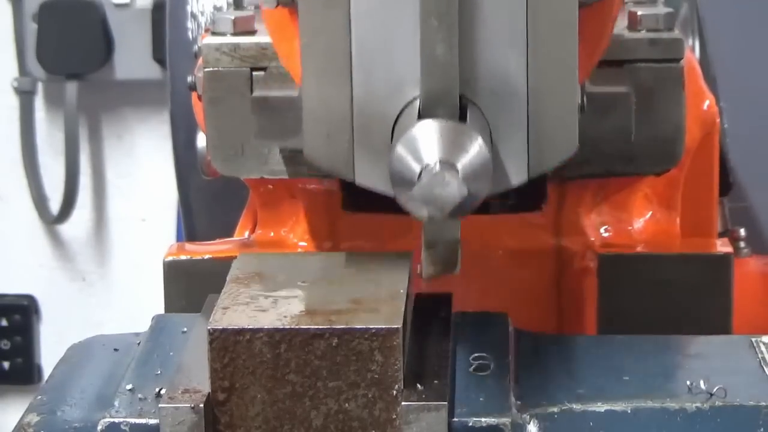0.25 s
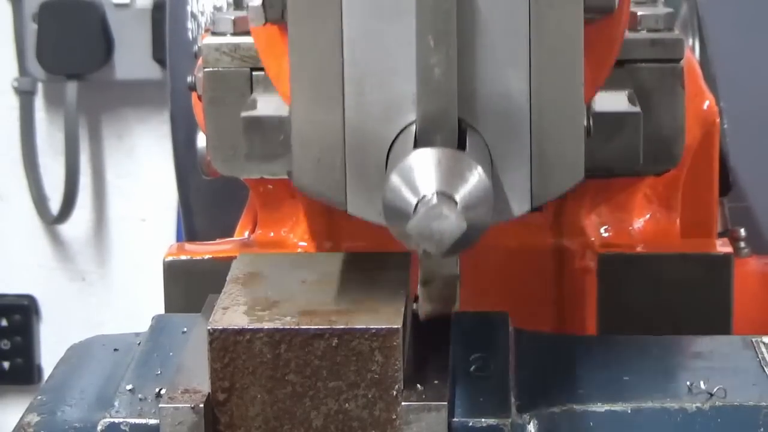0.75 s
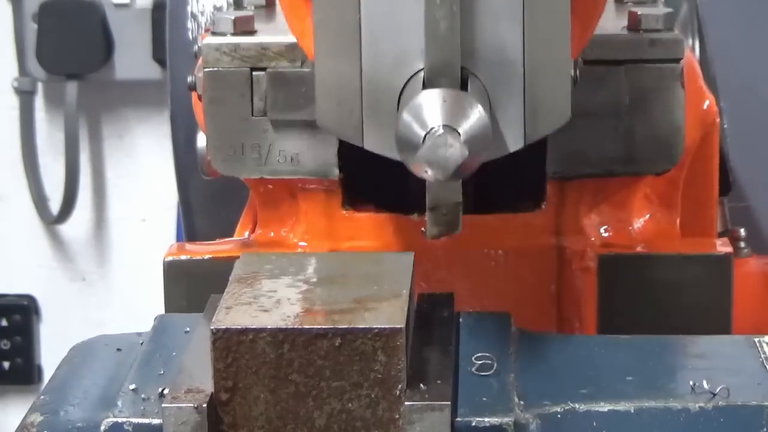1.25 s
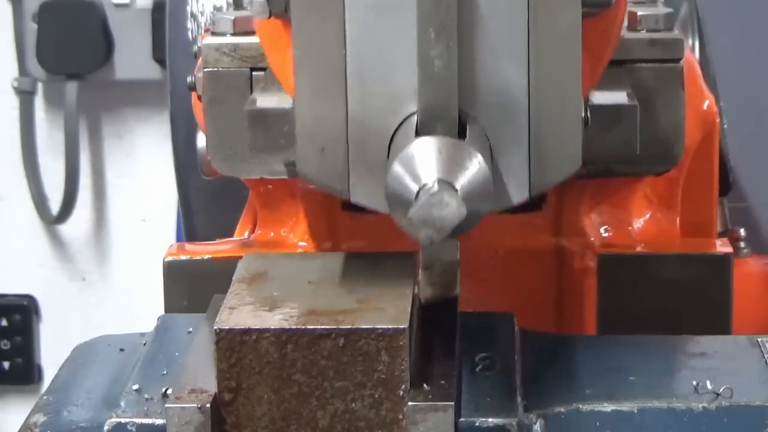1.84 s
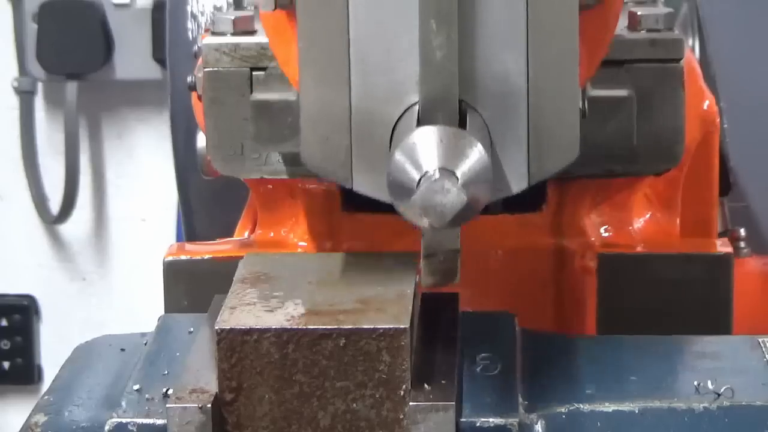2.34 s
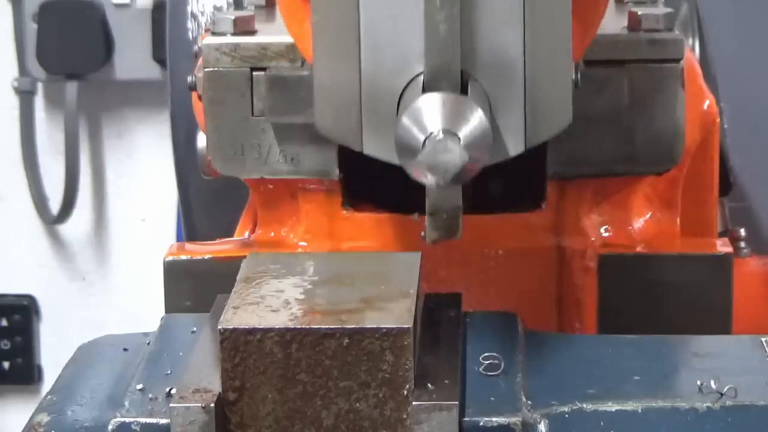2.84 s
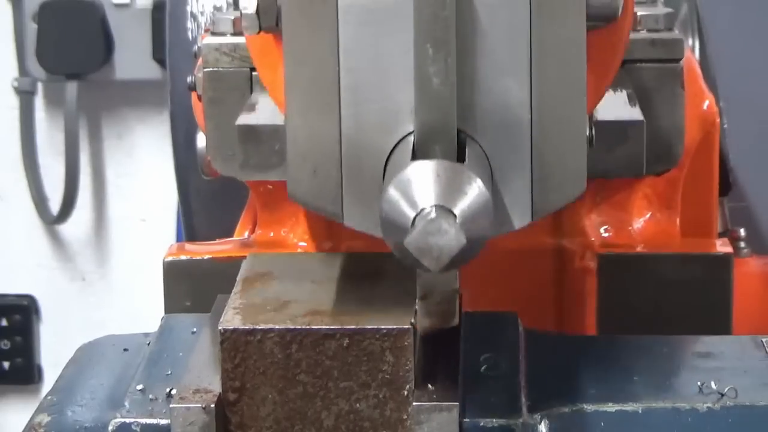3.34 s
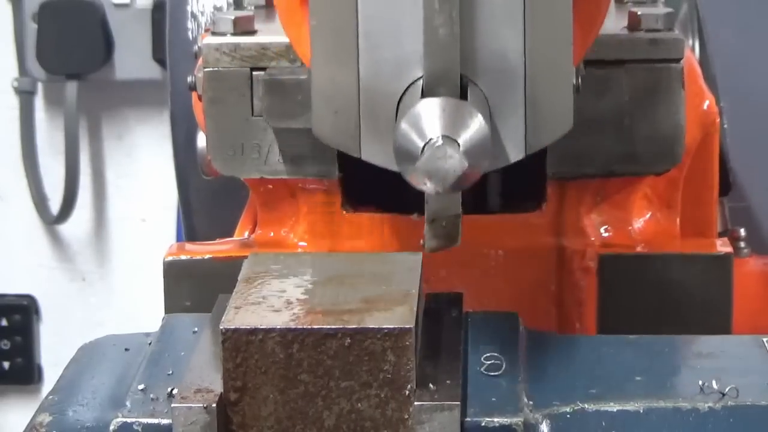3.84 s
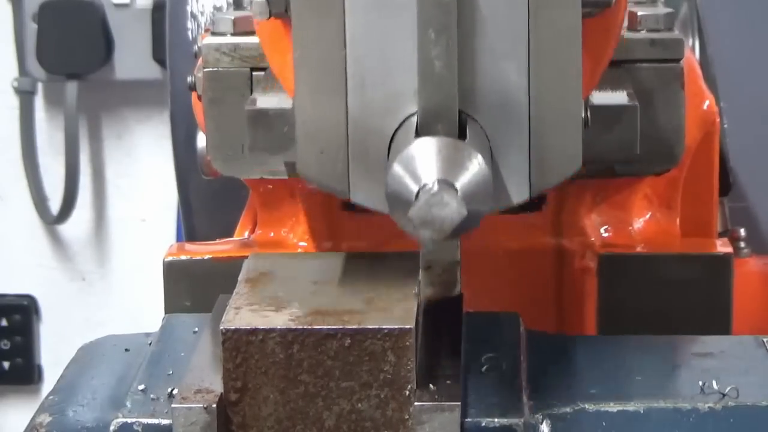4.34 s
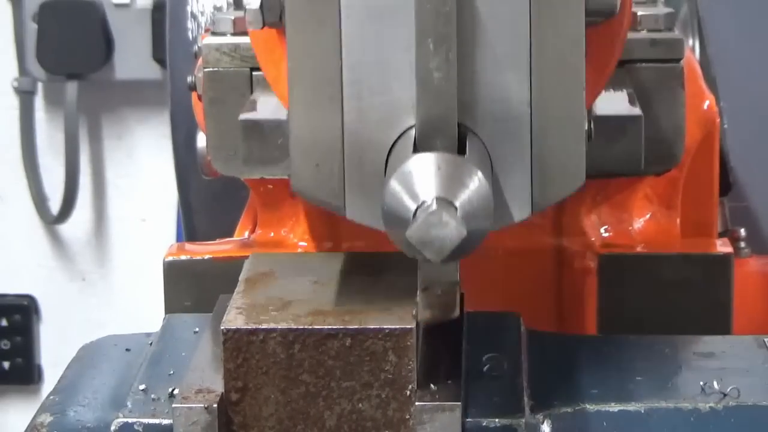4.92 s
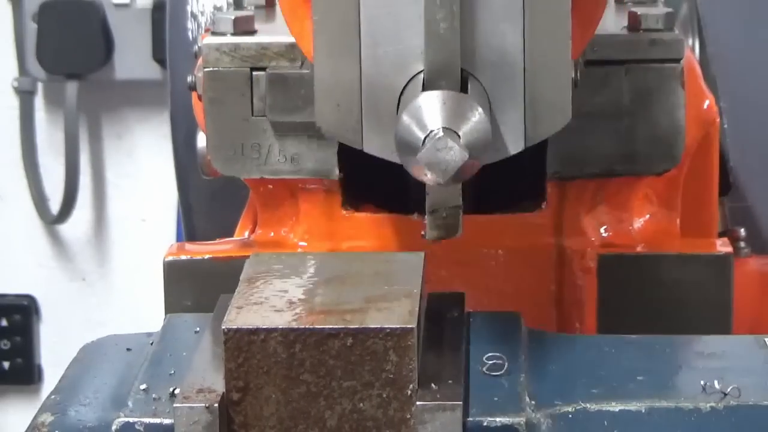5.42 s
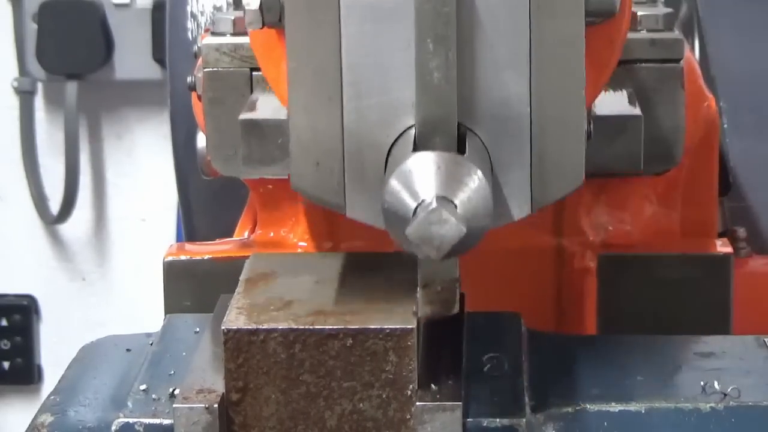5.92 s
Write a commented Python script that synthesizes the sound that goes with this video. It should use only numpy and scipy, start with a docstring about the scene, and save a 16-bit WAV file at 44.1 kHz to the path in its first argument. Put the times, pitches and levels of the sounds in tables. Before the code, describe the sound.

Close beside a running shaping machine: low, rough gear drone swelling and booming in a regular beat, ram slides hissing on the cut and rasping brighter on the quick return, and a piercing electric whine above. Rapid metallic ratchet clicks with gritty screw rubs come in the first two and a half seconds, thinning to pairs each stroke. A few chips crackle and ring, with faint short workshop echo.

```python
"""A small metal shaper cuts a steel block close by: its gear-driven casting drones and swells each stroke.
Two casting tones, gear-tooth tones and filtered noise from the sliding ram follow the stroke.
The motor whines in a cluster of wavering sine tones, over a low hum and a steady hiss.
Chips snap and ring as short bursts of noise; the feed ratchet clicks in fading sines and noise,
its screw rubs, and the clicks, rubs and chips echo faintly off the workshop walls."""
import sys
import numpy as np
from scipy import signal
from scipy.fft import rfft, irfft
from scipy.io import wavfile

SR = 44100
rng = np.random.default_rng(int(sys.argv[2]) if len(sys.argv) > 2 else 0)


def materialize(psi):
    """Save the field psi as 16-bit PCM at rate SR to the path in sys.argv[1].

    A 1-D psi becomes a single channel; in a 2-D psi each row is a channel.
    """
    bounded = np.clip(np.atleast_2d(psi).T, -1, 1)
    quanta = np.round(bounded * 32767).astype(np.int16)
    wavfile.write(sys.argv[1], SR, quanta)


N = 271656
TIME = np.arange(N) / SR  # seconds
BINS = np.fft.rfftfreq(N, 1 / SR)  # Hz

STROKE_S = .8268  # one turn of the bull gear (the big gear)
TEETH, SHAFT_TURNS = 80, 16  # bull gear teeth, and pinion shaft turns in a stroke
EDGE_HZ = 11030  # top of the sound's range
EASE_DB_PER_S = 0.21  # the machine runs a little lighter as it goes on

# Motor drive: switching rate, supply frequency, passing rate of the rotor slots
CARRIER_HZ, DRIVE_HZ, SLOT_HZ = 7823.35, 50.06, 743.5
# Whine tones around the switching rate: [supply_multiple, slot_multiple, level_db, left_over_right_db]
WHINE_TONES = [(-11, 0, -45, 1), (-8, 0, -53, -1), (-7, 0, -50, -1), (-5, 0, -35, 6), (-4, 0, -44, 1),
               (-3, 0, -42, 0), (-1, 0, -48, -4), (0, 0, -54, 3), (1, 0, -28, -2), (2, 0, -45, 1),
               (3, 0, -51, 0), (4, 0, -44, -1), (5, 0, -36, 0), (6, 0, -51, 2), (7, 0, -46, -3),
               (8, 0, -55, 1), (-1, -1, -58, 0), (1, -1, -52, 0), (5, -1, -54, 4), (-5, 1, -51, -2),
               (-1, 1, -45, -1), (1, 1, -49, 0)]
# The motor's low hum: [pitch_hz, level_db]
MOTOR_HUM = (53.3, -67)

# The casting's two main modes, lower then upper:
# [pitch_hz, idle_level_db, pitch_sway_hz, beat_with_shaft (0-1)]
CASTING_MODES = [(288.3, -33.5, 3.16, 0), (324.8, -37.5, 5.3, 0.44)]
# Spells of load on the bull gear in every stroke: [start_s, length_s, lower_mode_db, upper_mode_db]
GEAR_LOADS = [(.005, 0.065, -48, -29.5), (0.127, .035, -44, -27), (0.211, 0.11, -25.5, -35.5),
              (0.358, 0.023, -29.5, -31.5), (.53, 0.073, -33, -32.5), (0.63, 0.096, -33.5, -32.5),
              (0.792, 0.063, -26, -30.5)]
LOAD_ATTACK_S, LOAD_RELEASE_S = .025, 0.031
# The boom of each stroke, when the gear takes up its play: moment in the stroke, width, level
BEAT_S, BEAT_WIDTH_S, BEAT_DB = 0.2168, 0.015, -20.5

# Tooth-rate tones, each furthest from its opposite level at moment_s in the stroke;
# a negative swing makes that the quietest moment: [multiple, middle_level_db, moment_s, swing_db]
TOOTH_TONES = [(1, -62.5, 0.7, 2), (2, -53.5, 0.71, 7), (5, -53, .24, 10.5), (8, -49, 0.52, 8.5),
               (11, -50, 0.54, -11)]

# Rubs of the slides in every stroke (return, run-up, bite, cut):
# [start_s, length_s, gear_rumble_db, slide_hiss_db, treble_over_hiss_db]
SLIDE_RUBS = [(0.379, 0.17, -31.5, -33, 1), (0.577, 0.13, -42, -41.5, 3), (0.761, 0.073, -36, -38.5, 4),
              (0.0043, 0.15, -30.5, -32, 1)]
RUB_ATTACK_S, RUB_RELEASE_S = 0.03, 0.029
IDLE_RUMBLE_DB, IDLE_HISS_DB, IDLE_BRIGHT_DB = -32, -50, 6.5
# The quick return's part of each stroke: [from_s, to_s]
QUICK_RETURN = (0.38, .62)
# Colour of the gear rumble: [pitch_hz, relative_level_db]
RUMBLE_COLOUR = [(40, -47), (150, -15.5), (250, -13), (370, 3), (480, -0.5), (570, -2), (680, 1.5),
                 (790, 1), (960, -1.5), (1060, -0.5), (1250, -4.5), (1600, -7.5), (2700, -9), (3300, -17.5),
                 (6000, -57)]
# Panel resonances of the column: [pitch_hz, width_hz, level_db]
COLUMN_PANELS = [(450, 20, -6), (619, 11, -4), (771, 22, 3), (864, 41, 2.5), (1061, 16.4, 3)]
# Colour of the slide hiss on the quick return: [pitch_hz, relative_level_db]
RETURN_COLOUR = [(400, -30), (1500, -20), (1720, -5.5), (1830, 10), (1950, -4), (2200, 4.5), (2400, -5.5),
                 (2700, -4), (3000, -22), (3400, -12.5), (4050, -2.5), (4700, -16), (5600, -16.5),
                 (11000, -33.5)]
# Resonances of the ram, rung on the quick return: [pitch_hz, width_hz, level_db]
RAM_MODES = [(1880, 58, -14), (2020, 81, -1), (2274, 67, 6.5), (4720, 160, 0)]
# Colour of the slide hiss in the rest of the stroke: [pitch_hz, relative_level_db]
CUT_COLOUR = [(100, -47), (500, -24), (1500, -8.5), (1850, 2), (2150, 2), (2700, 1.5), (3000, -9.5),
              (3400, -9), (4300, -4), (5000, -10), (5700, -15.5), (8000, -9), (11000, -34)]

# Colour of the steady background hiss: [pitch_hz, relative_level_db]
FLOOR_COLOUR = [(20, -9), (38, -9), (54, -2), (72, -2), (110, -7), (160, 11.5), (400, -25), (2000, -4.5),
                (6500, -8.5), (7300, 4.5), (7900, 14), (8500, 7), (9500, -8), (11000, -64)]

# Chips breaking off or landing: [start_s, snap_db, ring_db, ring_pitch_hz, ring_width_hz, ring_60db_fall_s]
CHIP_SNAPS = [(0.3138, -30, -26.5, 2270, 500, 0.14), (.335, -32, -34, 2450, 300, 0.088),
              (1.9384, -22.5, -26, 2630, 500, 0.16), (1.955, -43, -27.5, 1110, 604, 0.19),
              (4.326, -24.5, -31, 1114, 600, 0.13), (4.366, -30, -26, 1148, 600, 0.18),
              (5.1374, -28.5, -25, 1446, 202.3, 0.11), (5.139, -35, -34, 6100, 500, 0.11),
              (5.15, -33, -30, 1162, 690, .12), (5.977, -24, -24, 4060, 864, 0.15),
              (5.982, -44, -13.5, 2757, 130.5, 0.077), (6.007, -33, -29, 2900, 130, 0.14),
              (6.137, -49, -27, 2900, 502, .1)]
# Colour of scraping metal: [pitch_hz, relative_level_db]
SCRAPE_COLOUR = [(80, -46), (300, -24), (900, 0.5), (1500, -4.5), (2100, 2), (2600, -0.5), (3600, -1.5),
                 (4600, -3), (6800, -8.5), (9300, -4.5), (11000, -20.5)]

# Ratchet clicks: [start_s, level_db, treble_crack_db]
PAWL_CLICKS = [(0.6577, -14.5, -3), (0.7637, -10, -5.5), (0.79, -21, -6), (0.812, -8, -2), (0.852, -9, 1),
               (0.8894, -7.5, 1), (0.926, -11, 4), (0.963, -11.5, 5.5), (1.021, -9.5, -8),
               (1.2036, -11.5, 4), (1.2439, -9.5, 1.5), (1.28, -11.5, 1), (1.3148, -5.5, -2.5),
               (1.3498, -11, 5.5), (1.388, -8, -0.5), (1.429, -8, -3), (1.4751, -9, -2.5), (1.53, -9.5, 2),
               (1.6141, -9, -3), (1.736, -11, -5), (2.2622, -10.5, -3.5), (2.3671, -12, -1),
               (2.4418, -9.5, 1), (2.485, -7.5, -2), (2.5514, -16, -1), (2.566, -20.5, 6.5),
               (2.969, -12.5, -4), (3.064, -11, -5.5), (3.1354, -9.5, -8), (3.25, -10, -2),
               (3.923, -9, -10), (4.0067, -9.5, -5.5), (4.772, -11, -1.5), (4.8835, -10.5, -2),
               (5.619, -12, 3.5), (5.745, -7.5, -8), (6.14, -7.5, -19)]
# Ring of the ratchet wheel: [pitch_hz, level_db, 60db_fall_s]
WHEEL_MODES = [(2060, 3, 0.021), (2065, -4.5, 0.027), (2416, -2.5, .05), (2553, 2, 0.095),
               (2695, 1.5, 0.042), (2966, 5.5, 0.014), (3170, -5, 0.07), (3313, 4.5, 0.032),
               (3523, 3, 0.031), (3730, -14, 0.091), (3820, 0, 0.03), (4260, -16, .03), (5530, -2.5, 0.026),
               (6060, -4, 0.027)]
# Quick turns of the feed screw: [start_s, length_s, starting_level_db]
FEED_TURNS = [(.82, 0.22, -31), (1.216, 0.33, -28.5), (2.419, 0.038, -25)]
# The screw rubs less as each turn slows, hence the sag
FEED_ATTACK_S, FEED_RELEASE_S, FEED_SAG_DB_PER_S = 0.056, 0.029, 25

# How alike noise is on the left and right: [pitch_hz, likeness (0-1)]
LIKENESS = [(50, 0.25), (300, 0.85), (600, 0.7), (1200, 0.83), (2500, 0.8), (8000, 0.9)]
# Left-right balance: [pitch_hz, left_over_right_db]
BALANCE = [(50, 6.5), (330, 1), (700, 2.5), (1300, 0.5), (8000, -1)]
# How fast workshop echoes die: [pitch_hz, 60db_fall_s]
WORKSHOP_ECHO = [(300, 0.25), (2500, 0.25), (9000, 0.079)]


def amp(db):
    """Turns decibels into gain."""
    return 10 ** (np.asarray(db) / 20)


def unit(x):
    """Scales a signal to rms 1."""
    return x / np.sqrt(np.mean(x ** 2) + 1e-20)


def read(points, hz):
    """Reads a table between its points, on a log-frequency axis."""
    f, value = np.transpose(points)
    return np.interp(np.log(hz + 1), np.log(f + 1), value)


def add(mix, s, sound):
    """Adds a stereo sound, starting at time s."""
    part = mix[:, round(s * SR):][:, :sound.shape[-1]]
    part += sound[..., :part.shape[1]]


def wander(rate_hz):
    """Random drift of rms 1, in straight steps between two chance values per cycle of the rate."""
    knots = np.arange(0, TIME[-1] + 1, .5 / rate_hz)
    return unit(np.interp(TIME, knots, rng.standard_normal(len(knots))))


def pan(db):
    """Left and right gains for a level difference."""
    return amp(np.array([[.5], [-.5]]) * db)


def peak(hz, width_hz):
    """Gain of one resonance at every frequency, 1 at its top."""
    return 1 / np.sqrt(1 + (2 * (BINS - hz) / width_hz) ** 2)


def resonances(modes):
    """Flat gain of 1 with a hump for each resonance."""
    return 1 + sum(amp(db) * peak(hz, width) ** 2 for hz, width, db in modes)


def noise(gain):
    """Coloured stereo noise of rms 1, partly shared between left and right."""
    common, apart = rfft(rng.standard_normal((2, N)))
    like = np.clip(read(LIKENESS, BINS), 0, 1)
    sides = np.array([[1], [-1]])
    pair = np.sqrt(1 + like) * common + sides * np.sqrt(1 - like) * apart
    return unit(irfft(pair * gain * pan(read(BALANCE, BINS)), N))


def snippet(x, size):
    """Takes a stretch of stereo noise at random."""
    return x[:, rng.integers(N - size):][:, :size]


def grit(per_s, depth_db, decay_s=0.0011):
    """Gain that jumps at each small catch between rubbing surfaces, rms 1."""
    catches = (rng.random(N) < per_s / SR) * np.minimum(rng.exponential(1, N), 3)
    jumps = signal.lfilter([1], [1, -np.exp(-1 / (decay_s * SR))], catches)
    return unit(1 + amp(depth_db) * jumps)


def swell(t, length_s, attack_s, release_s):
    """Rise, hold and fall of something that starts at t = 0."""
    return np.clip(t / attack_s, 0, 1) * np.exp(-np.maximum(t - length_s, 0) / release_s)


def every_stroke(starts, lengths, levels_db, idle_db, attack_s, release_s):
    """Gain of swells that come back each stroke; their powers add to an idling level."""
    swells = [amp(db) * swell((TIME - s) % STROKE_S, length, attack_s, release_s)
              for s, length, db in zip(starts, lengths, levels_db)]
    return np.sqrt(amp(idle_db) ** 2 + np.sum(np.square(swells), 0))


def gear_wear(count):
    """Chance unevenness round the bull gear, the same at every turn."""
    marks = rng.standard_normal(count)
    marks = unit(marks - marks.mean())
    return np.interp(count * TIME / STROKE_S, np.arange(count), marks, period=count)


def shaft(top_s):
    """Swing of the pinion shaft, highest at the given moment."""
    return np.cos(2 * np.pi * SHAFT_TURNS * (TIME - top_s) / STROKE_S)


def easing():
    """Slow loss of load: a falling gain that is 1 halfway through."""
    return amp(-EASE_DB_PER_S * (TIME - TIME.mean()))


def motor(left_lead_rad=0.23, hum_drift_rad=0.73, waver_rad=0.097, flutter=0.085, side_flutter=.07):
    """Inverter switching makes the motor sing at tones spaced by the supply and slot rates, over a hum."""
    sway = [wander(8) for _ in range(4)]
    sides = np.array([[1], [-1]])
    lead = np.array([[left_lead_rad], [0]])
    whine = np.zeros((2, N))
    for k, (supply, slots, db, side_db) in enumerate(WHINE_TONES):
        hz = CARRIER_HZ + supply * DRIVE_HZ + slots * SLOT_HZ
        pitch_sway, level_sway, side_sway = (sway[(k + step) % len(sway)] for step in range(3))
        phase = 2 * np.pi * (hz * TIME + rng.random()) + waver_rad * pitch_sway
        # each tone flutters, and drifts a little between left and right
        level = 1 + flutter * level_sway + sides * side_flutter * side_sway
        whine += pan(side_db) * amp(db) * level * np.sin(phase + lead)
    hum_hz, hum_db = MOTOR_HUM
    hum = amp(hum_db) * np.sin(2 * np.pi * hum_hz * TIME + hum_drift_rad * wander(2.6))
    return np.sqrt(2) * (whine + pan(read(BALANCE, hum_hz)) * hum)


def casting(rough=0.39, rough_width_hz=50, side_db=3.5, left_lead_rad=0.2, shaft_top_s=0.221):
    """Gear teeth drive two modes of the casting, harder under load; the lower one booms once a stroke."""
    starts, lengths, *levels_db = np.transpose(GEAR_LOADS)
    beat = amp(BEAT_DB) * np.exp(-((TIME % STROKE_S - BEAT_S) / BEAT_WIDTH_S) ** 2)
    lead = np.array([[left_lead_rad], [0]])
    out = np.zeros((2, N))
    for (hz, idle_db, sway_hz, throb), load_db, boom in zip(CASTING_MODES, levels_db, (beat, 0)):
        load = every_stroke(starts, lengths, load_db, idle_db, LOAD_ATTACK_S, LOAD_RELEASE_S)
        level = load * (1 + throb * shaft(shaft_top_s)) + boom
        cycles = np.cumsum(hz + sway_hz * gear_wear(count=24)) / SR
        # retune to whole cycles per stroke, locked to the bull gear, so every stroke beats alike
        per_stroke = cycles[round(STROKE_S * SR)]
        cycles = cycles * round(per_stroke) / per_stroke
        tone = np.sqrt(2) * level * np.sin(2 * np.pi * (cycles + rng.random()) + lead)
        # play between the teeth: no two blows are alike, so noise surrounds the tone
        backlash = rough * level.mean() * noise(peak(hz, rough_width_hz) ** 2)
        out += pan(side_db) * tone + backlash
    return out * easing()


def mesh(jitter_rad=0.94, side_db=3):
    """Meeting gear teeth sound multiples of the tooth rate, swelling and fading as the load goes round."""
    teeth_passed = TEETH * TIME / STROKE_S
    out = np.zeros(N)
    for multiple, db, moment_s, swing_db in TOOTH_TONES:
        level = amp(db + swing_db * np.cos(2 * np.pi * (TIME - moment_s) / STROKE_S))
        phase = 2 * np.pi * (multiple * teeth_passed + rng.random()) + jitter_rad * wander(7.6)
        out += level * np.sin(phase)
    return np.sqrt(2) * pan(side_db) * out


def ram(return_db=1, shaft_db=0.24, shaft_top_s=0.033, tooth_db=0.15, wear_db=2.0, grit_db=-3,
        bright_hz=3300):
    """Gear rumble rings the column's panels; the slides hiss on the cut and on the quick return."""
    starts, lengths, rumble_db, hiss_db, bright_db = np.transpose(SLIDE_RUBS)

    def rubs(levels_db, idle_db):
        """Level of the rubbing through every stroke."""
        return every_stroke(starts, lengths, levels_db, idle_db, RUB_ATTACK_S, RUB_RELEASE_S)

    throb_db = shaft_db * shaft(shaft_top_s)
    throb_db = throb_db + tooth_db * np.cos(2 * np.pi * TEETH * TIME / STROKE_S)
    throb_db = throb_db + wear_db * gear_wear(count=TEETH)
    body = amp(read(RUMBLE_COLOUR, BINS)) * resonances(COLUMN_PANELS)
    rumble = noise(body) * rubs(rumble_db, IDLE_RUMBLE_DB) * amp(throb_db)

    moment = TIME % STROKE_S
    returning = (moment > QUICK_RETURN[0]) & (moment < QUICK_RETURN[1])
    rasp = amp(read(RETURN_COLOUR, BINS)) * resonances(RAM_MODES)
    hiss = np.where(returning, amp(return_db) * noise(rasp), noise(amp(read(CUT_COLOUR, BINS))))
    # split off the treble, which follows its own level
    treble = irfft(rfft(hiss) / (1 + (bright_hz / (BINS + 1)) ** 8), N)
    low_part = (hiss - treble) * rubs(hiss_db, IDLE_HISS_DB)
    high_part = treble * rubs(hiss_db + bright_db, IDLE_HISS_DB + IDLE_BRIGHT_DB)
    return rumble + (low_part + high_part) * easing() * grit(200, grit_db)


def background(level_db=-39):
    """Steady hiss of the motor and the shop, as coloured noise."""
    return amp(level_db) * noise(amp(read(FLOOR_COLOUR, BINS)))


def chips(snap_s=0.014, grit_db=3, fizz_db=-9, fizz_hz=9500):
    """A curl of steel snaps in a gritty noise burst and rings roughly, as fading narrow noise."""
    fizz = amp(fizz_db) * noise(peak(fizz_hz, 2500) ** 2)
    scrape = (noise(amp(read(SCRAPE_COLOUR, BINS))) + fizz) * amp(grit_db * wander(300))
    t = np.arange(SR // 4) / SR
    out = np.zeros((2, N))
    for s, snap_db, ring_db, hz, width_hz, fall_s in CHIP_SNAPS:
        ring = snippet(noise(peak(hz, width_hz) ** 2), len(t)) * amp(ring_db - 60 * t / fall_s)
        snap = snippet(scrape, len(t)) * amp(snap_db) * np.exp(-t / snap_s)
        add(out, s, (snap + ring) * (1 - np.exp(-t / 0.00028)))  # soft onset
    return out


def feed_screw(scrape, grit_db=3):
    """The feed screw rubs in short gritty turns, each growing weaker as it slows."""
    rub = np.zeros(N)
    for s, length, db in FEED_TURNS:
        sagging_db = db - FEED_SAG_DB_PER_S * np.maximum(TIME - s, 0)
        rub += amp(sagging_db) * swell(TIME - s, length, FEED_ATTACK_S, FEED_RELEASE_S)
    return scrape * rub * grit(250, grit_db)


def feed(ring_db=-11, crack_db=-2, crack_s=0.0012, rattle_db=-15, rattle_s=0.0086,
         rattle_width_hz=130, scatter_db=2, bounce=0.43, bounce_s=0.0046):
    """The pawl (catch) drops, bounces twice and chatters on the ringing wheel; the screw rubs beneath."""
    scrape = noise(amp(read(SCRAPE_COLOUR, BINS)))
    chatter = noise(sum(amp(db) * peak(hz, rattle_width_hz) ** 2 for hz, db, _ in WHEEL_MODES))
    out = feed_screw(scrape)
    t = np.arange(SR // 10) / SR
    hz, db, fall_s = np.transpose(WHEEL_MODES)[:, :, None]
    for s, click_db, treble_db in PAWL_CLICKS:
        # every click strikes the modes a little differently
        size, detune, phase = rng.standard_normal((3, len(hz), 1))
        fade = amp(db + scatter_db * size - 60 * t / fall_s)
        tones = fade * np.sin(2 * np.pi * (hz * (1 + 0.0084 * detune) * t + phase))
        ring = tones.sum(0) / np.linalg.norm(fade[:, 0])
        gap = bounce_s * rng.uniform(0.62, 1.1)
        blows = sum(bounce ** k * (t >= k * gap) * np.exp(-abs(t - k * gap) / crack_s)
                    for k in range(3))
        crack = snippet(scrape, len(t)) * amp(treble_db + crack_db) * blows
        rattle = snippet(chatter, len(t)) * amp(rattle_db) * np.exp(-t / rattle_s)
        click = amp(click_db) * (amp(ring_db) * ring + crack + rattle)
        add(out, s, click * (1 - np.exp(-t / 0.0005)))  # soft onset
    return out


def room(x, first_s=.004, shared=0.59):
    """Sparse reflections from the workshop walls, each band dying at its own speed."""
    taps = rng.standard_normal((2, SR // 2)) * (rng.random((2, SR // 2)) < 2500 / SR)
    taps = taps + shared * taps[::-1]  # left and right share some reflections
    hz, t, bands = signal.stft(taps, SR, nperseg=256)
    fade = (t > first_s) * amp(-60 * t / read(WORKSHOP_ECHO, hz)[:, None])
    tail = signal.istft(bands * fade, SR, nperseg=256)[1]
    return signal.fftconvolve(x, tail / np.linalg.norm(tail[0]), axes=1)[:, :N]


def scene(room_db=-7):
    """The running machine over the background hiss, with echoes of its chips and feed."""
    machine = motor() + casting() + mesh() + ram()
    floor = background()
    metal = chips() + feed()
    return machine + floor + metal + amp(room_db) * room(metal)


def record(dry):
    """Removes everything above the top of the range with a steep low-pass filter."""
    low_pass = signal.firwin(401, EDGE_HZ, window=("kaiser", 8), fs=SR)
    return signal.oaconvolve(dry, low_pass[None], "same")


dry = scene()
out = record(dry)
materialize(out)
```